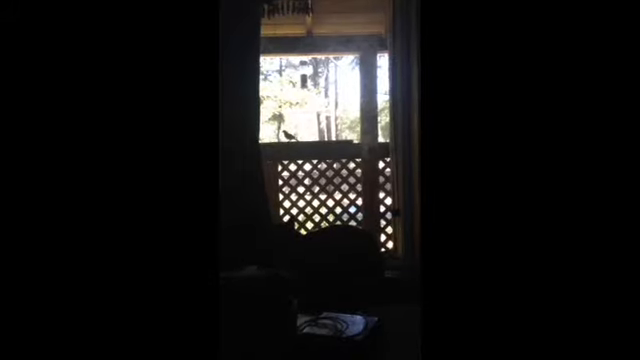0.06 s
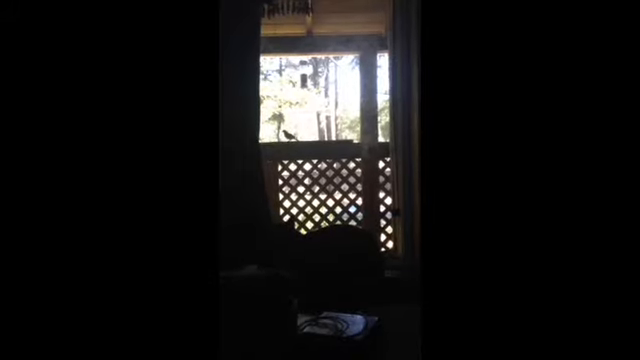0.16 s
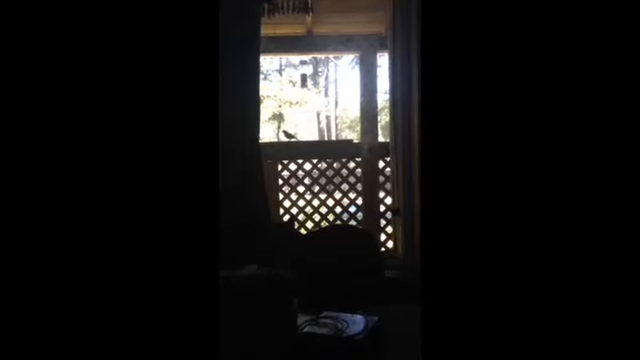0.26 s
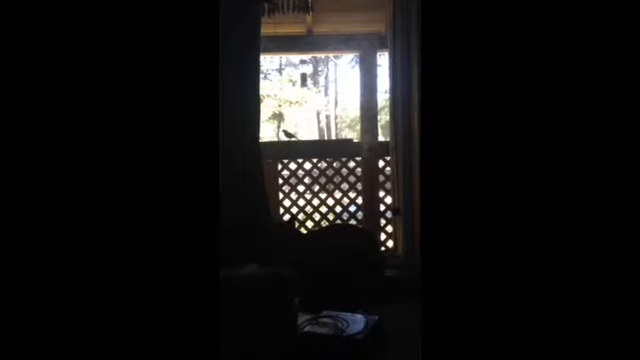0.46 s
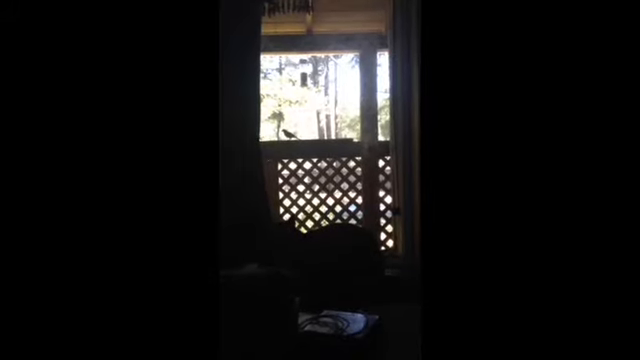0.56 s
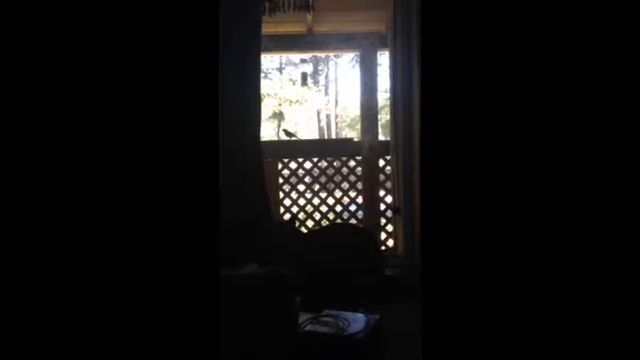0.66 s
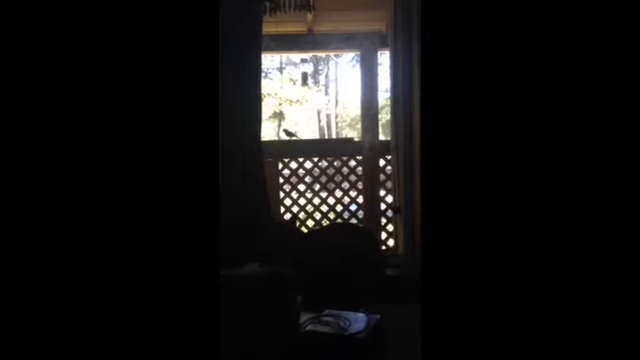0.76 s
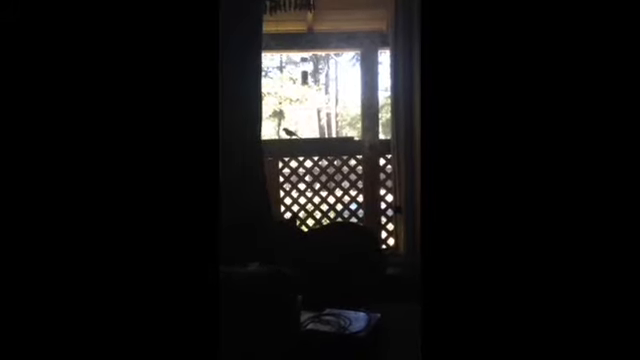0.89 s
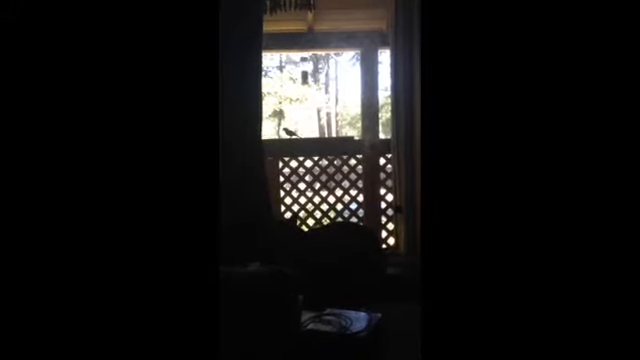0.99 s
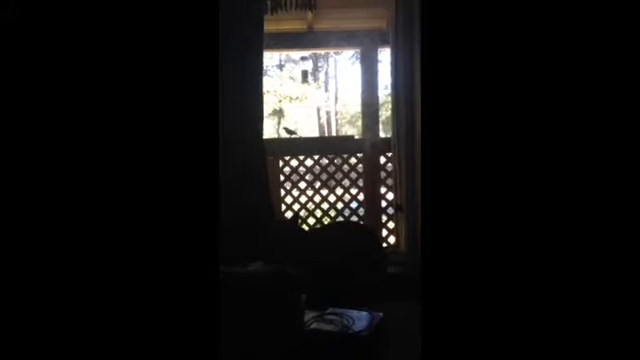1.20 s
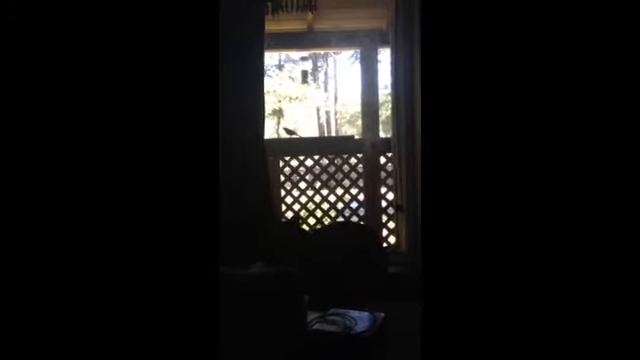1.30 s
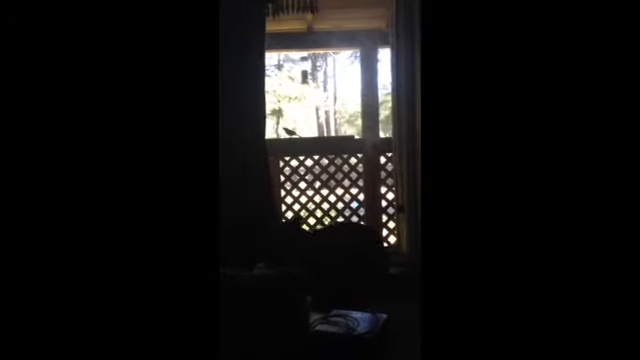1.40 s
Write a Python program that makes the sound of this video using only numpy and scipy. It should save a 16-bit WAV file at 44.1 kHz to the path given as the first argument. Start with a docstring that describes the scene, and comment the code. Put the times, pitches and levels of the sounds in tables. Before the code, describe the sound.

One thin bird chirp from outdoors, heard in a quiet room with faint rumble.

```python
"""One thin chirp from a small bird outside a window: a quick drop onto a short note, then a fading upturn.
The chirp is a gliding, almost pure tone; the porch throws it back and the trees let it ring on.
Far off, a faint falling whistle answers. Under it all lies the bed of a quiet room:
rumble and hiss, faint drones and whines, and a low hum whose two close tones slowly beat."""
import sys
import numpy as np
from scipy import signal
from scipy.fft import rfft, irfft
from scipy.io import wavfile

SR = 44100
rng = np.random.default_rng(int(sys.argv[2]) if len(sys.argv) > 2 else 0)


def bounce(signal):
    """Save signal as a 16-bit WAV file at the path given by the first command-line argument."""
    frames = np.transpose(np.atleast_2d(signal))
    limited = np.clip(frames, -1, 1)
    pcm = np.round(limited * 32767).astype(np.int16)
    wavfile.write(sys.argv[1], SR, pcm)


N = 63945

# The colour of the room's rumble and hiss. Each row: frequency in Hz, relative level in dB.
ROOM_SPECTRUM = [(25, -38.5), (80, -25.5), (130, -21.5), (170, -3.5), (220, -1.5), (270, -8.5),
                 (450, -11.5), (750, -18), (1800, -21.5), (2800, -25), (5000, -26), (7500, -29.5),
                 (10000, -35), (13500, -29), (15300, -26.5)]
# The room's faint drones and whines. Each row: pitch in Hz, rms level in dB.
ROOM_TONES = [(174, -78.5), (193, -78), (226, -76), (535, -89), (1534, -92.5), (13787, -97)]
# The line of the distant whistle. Each row: time in seconds, pitch in Hz, level in dB.
WHISTLE_CURVE = [(.55, 2217, -90.5), (.64, 2260, -87), (.69, 2150, -79.5), (.77, 2034, -84),
                 (.85, 1980, -73.5), (.905, 1947, -84)]
# The line of the near chirp. Each row: time in seconds, pitch in Hz, level in dB.
CHIRP_CURVE = [(.209, 6080, -56.5), (.212, 5480, -47), (.215, 5350, -51), (.219, 5140, -33.5),
               (.2235, 4940, -36), (.227, 4943, -27), (.2345, 4915, -29), (.239, 5077, -36.5),
               (.249, 5500, -66.5)]
# Single echoes off walls and trees. Each row: delay in seconds, level in dB against the dry call.
ECHO_TAPS = [(.0085, -6.5), (.028, -15), (.0415, -39), (.0535, -13), (.087, -33.5)]
# What the surroundings give back, as an EQ on the reverb send. Each row: frequency in Hz, boost in dB.
SCATTER_EQ = [(4500, 1), (4900, 5.5), (5100, 6.5), (5350, 13), (6000, 6), (10000, 8.5)]

ROOM_DB, WAVER_RAD = -67.5, 0.16  # level of the noise bed; phase wander of the hum and room tones
HUM_HZ, HUM_DB, BEAT_HZ, BEAT_PEAK_S = 118.8, -80, 2, .36
JITTER_DEPTH, JITTER_HZ = 0.0016, 510  # the birds' pitch tremble, its depth a fraction of the pitch
FLICK_START_S, FLICK_LENGTH_S, FLICK_FROM_HZ, FLICK_TO_HZ, FLICK_DB = .214, 0.0036, 5100, 4380, -59.5
OCTAVE_DB, OCTAVE_END_S = -25.5, 0.2313
PORCH_DB, PORCH_T60_S = -16.5, 0.15  # reverb levels are set against the send
TREES_DB, TREES_T60_S, WHISTLE_WET_DB = -24, .52, -4
TOP_CUT_HZ = 15350


def gain_of(db):
    """Turns decibels into gain."""
    return 10 ** (np.asarray(db) / 20)


def unit_rms(x):
    """Scales a signal to an rms of 1."""
    return x / np.sqrt(np.mean(x ** 2) + 1e-20)


def drift(rate_hz):
    """Smooth random modulation of rms 1, rolling off above rate_hz."""
    hz = np.fft.rfftfreq(N, 1 / SR)
    return unit_rms(irfft(rfft(rng.standard_normal(N)) * np.exp(-(hz / rate_hz) ** 2), N))


def coloured(x, eq):
    """Shapes a sound with an EQ curve drawn through (Hz, dB) points."""
    hz, db = np.transpose(eq)
    curve_db = np.interp(np.log(np.fft.rfftfreq(N, 1 / SR) + 1), np.log(hz), db)
    return irfft(rfft(x) * gain_of(curve_db), N)


def delayed(x, delay_s):
    """The same sound, arriving later."""
    return np.pad(x, (max(round(delay_s * SR), 0), 0))[:N]


def reverb(x, t60_s, build_s):
    """Scattered reflections that bloom and die away, as strong in all as the sound sent in."""
    t = np.arange(N) / SR
    reflections = rng.standard_normal(N) * (rng.random(N) < .1)
    bloom = 1 - np.exp(-(t / build_s) ** 2)
    decay = np.exp(-np.log(1000) * t / t60_s)
    wet = signal.fftconvolve(x, reflections * bloom * decay)[:N]
    return unit_rms(wet) * np.std(x)


def room():
    """The bed: steady rumble and hiss with faint, wavering drones and whines."""
    t = np.arange(N) / SR
    tones = sum(np.sqrt(2) * gain_of(db) * np.sin(2 * np.pi * hz * t + WAVER_RAD * drift(4))
                for hz, db in ROOM_TONES)
    noise = unit_rms(coloured(rng.standard_normal(N), ROOM_SPECTRUM))
    return gain_of(ROOM_DB) * noise + tones


def hum():
    """A low hum that swells and sinks as its two close tones beat."""
    t = np.arange(N) / SR - BEAT_PEAK_S
    phase = 2 * np.pi * HUM_HZ * t + WAVER_RAD * drift(3)
    upper_tone = gain_of(-3) * np.cos(phase + 2 * np.pi * BEAT_HZ * t)
    return np.sqrt(2) * gain_of(HUM_DB) * (np.cos(phase) + upper_tone)


def bird_note(curve, fade_s):
    """Phase and envelope of a slightly trembling note that glides through (s, Hz, dB) points."""
    t = np.arange(N) / SR
    times, hz, db = np.transpose(curve)
    fades = np.clip(np.minimum(t - times[0], times[-1] - t) / fade_s + 1, 0, 1)
    pitch_hz = np.interp(t, times, hz) * (1 + JITTER_DEPTH * drift(JITTER_HZ))
    phase = 2 * np.pi * np.cumsum(pitch_hz) / SR
    return phase, fades * gain_of(np.interp(t, times, db))


def far_bird():
    """One faint falling whistle, blurred by distance."""
    phase, envelope = bird_note(WHISTLE_CURVE, fade_s=.02)
    call = envelope * np.sin(phase)
    return call + gain_of(WHISTLE_WET_DB) * reverb(call, TREES_T60_S, build_s=0.017)


def flick():
    """A few milliseconds of steeply falling tone that sharpen the chirp's attack."""
    progress = np.clip((np.arange(N) / SR - FLICK_START_S) / FLICK_LENGTH_S, 0, 1)
    pitch_hz = FLICK_FROM_HZ + (FLICK_TO_HZ - FLICK_FROM_HZ) * progress
    envelope = gain_of(FLICK_DB) * np.sin(np.pi * progress)
    return envelope * np.sin(2 * np.pi * np.cumsum(pitch_hz) / SR)


def chirp():
    """An almost pure tone that dips in pitch; its weak octave drops out just before the upturn."""
    t = np.arange(N) / SR
    phase, envelope = bird_note(CHIRP_CURVE, fade_s=0.00106)
    octave_gain = gain_of(OCTAVE_DB) * np.clip((OCTAVE_END_S - t) / .003 + .5, 0, 1)  # 3 ms fade-out
    return envelope * (np.sin(phase) + octave_gain * np.sin(2 * phase))


def near_bird():
    """The chirp with its echoes, the short ring of the porch and the longer tail of the trees."""
    call = chirp() + flick()
    echoes = sum(gain_of(db) * delayed(call, delay_s) for delay_s, db in ECHO_TAPS)
    send = coloured(call, SCATTER_EQ)
    porch = gain_of(PORCH_DB) * reverb(send, PORCH_T60_S, build_s=0.004)
    trees = gain_of(TREES_DB) * reverb(send, TREES_T60_S, build_s=0.04)
    return call + echoes + porch + trees


def scene():
    """Both birds over the room bed and its hum, in mono."""
    return (near_bird() + far_bird() + room() + hum())[None]


def record(dry):
    """A steep high cut takes the very top off the mix."""
    lowpass = signal.firwin(511, TOP_CUT_HZ, window=("kaiser", 9), fs=SR)
    return signal.oaconvolve(dry, lowpass[None], "same")


dry = scene()
out = record(dry)
bounce(out)
```